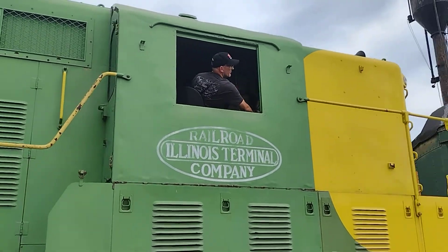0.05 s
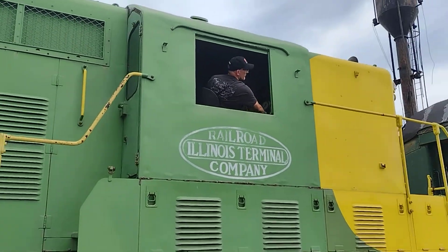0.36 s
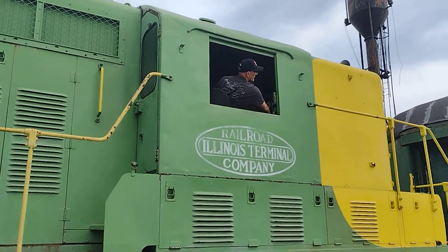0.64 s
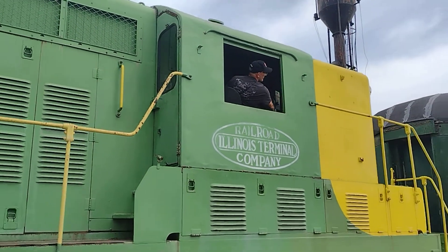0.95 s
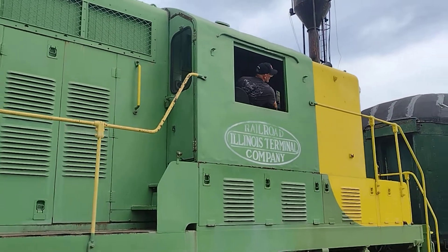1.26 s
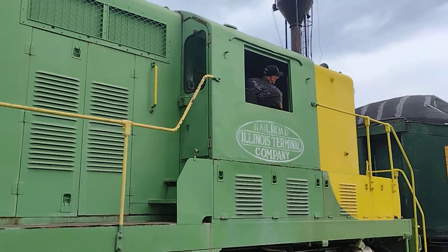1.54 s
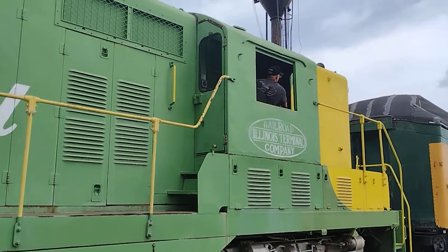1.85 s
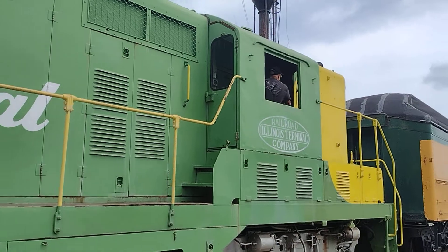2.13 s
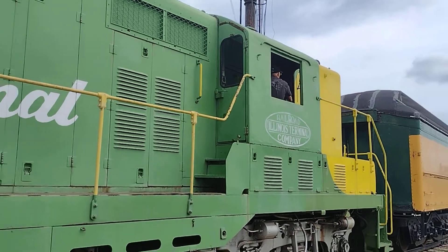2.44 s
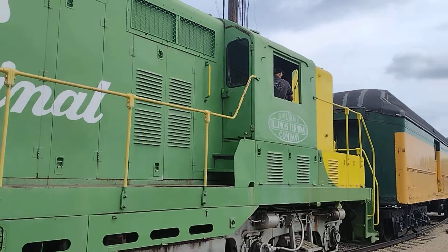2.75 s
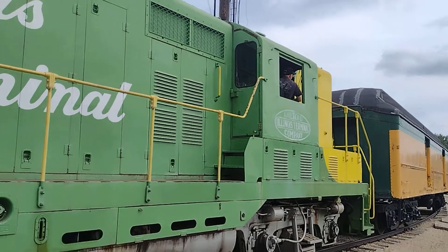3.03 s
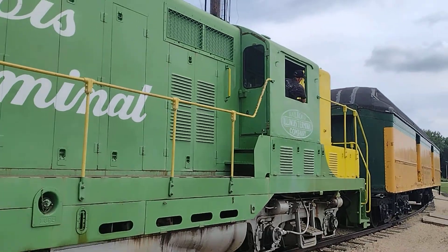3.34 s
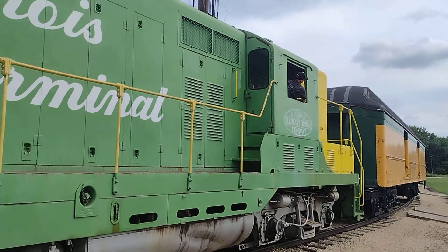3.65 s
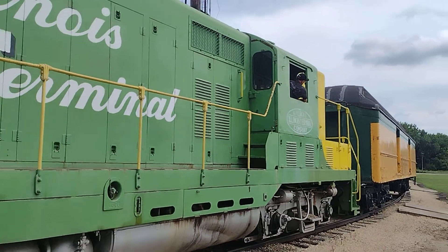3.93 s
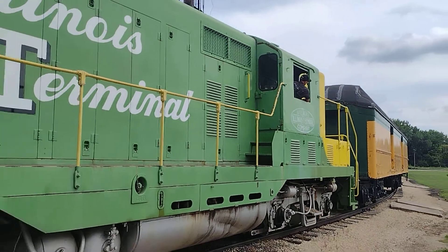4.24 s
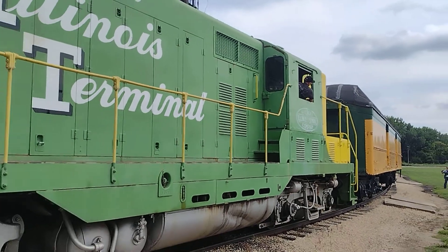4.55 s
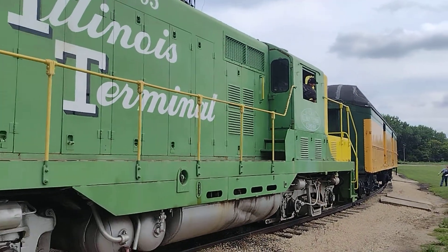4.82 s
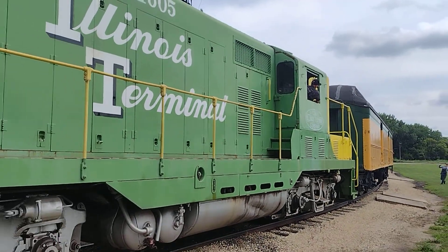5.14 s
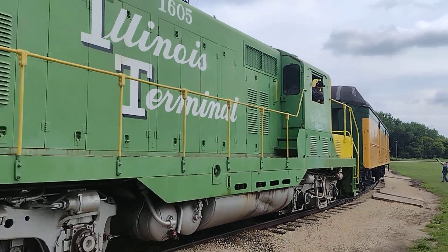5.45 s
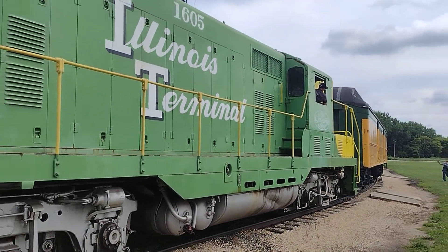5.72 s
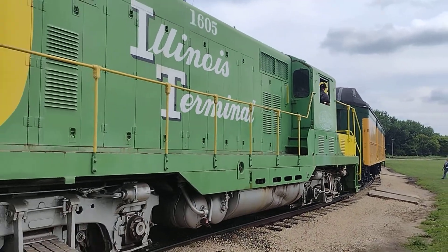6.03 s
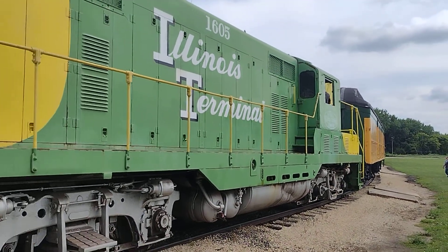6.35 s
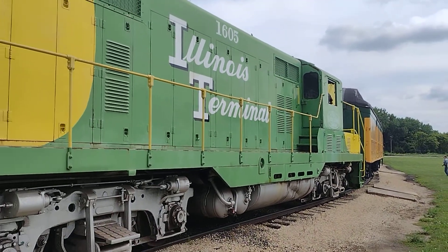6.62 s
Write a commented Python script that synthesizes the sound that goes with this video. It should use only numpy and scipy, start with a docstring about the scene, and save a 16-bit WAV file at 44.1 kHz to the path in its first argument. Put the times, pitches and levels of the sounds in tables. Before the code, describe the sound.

A diesel locomotive throbs slowly past at close range, a wheel squealing in bursts at first, followed by metal clinks, thuds and rattles.

```python
"""Outdoors, close beside a railway curve: a sixteen-cylinder two-stroke diesel locomotive slowly pushes a heavy
railcar past. Its firings pulse through exhaust, block, fans, gears and blower, each with its own swell as it
goes by. For the first two seconds a wheel sticks and slips on the rail, squealing while its flange rasps; later
the flange grinds briefly, the frame thuds and short bursts ring out near 2 kHz. Steel links clink and rigging
knocks over a soft bed of rolling hiss."""
import sys
import numpy as np
from scipy import signal
from scipy.fft import rfft, irfft, next_fast_len
from scipy.io import wavfile
from scipy.ndimage import map_coordinates

SR = 44100
rng = np.random.default_rng(int(sys.argv[2]) if len(sys.argv) > 2 else 0)


def master_out(mix):
    """Clip the mix to full scale and print it as 16-bit PCM to the path in sys.argv[1]."""
    frames = np.transpose(np.atleast_2d(mix))
    ceiling = np.clip(frames, -1, 1)
    pcm = np.round(ceiling * 32767).astype(np.int16)
    wavfile.write(sys.argv[1], SR, pcm)


N = 298998
TIME = np.arange(N) / SR
CRANK_HZ, SQUEAL_HZ = 4.245, 1967.2

# where the engine sits in the stereo image: t/s, right-ear lag/ms, left over right/dB
ENGINE_BEARING = [(0, 0.4, 0), (2.7, 0.47, 0.3), (4.7, 0.33, 0.3), (5.7, 0.23, .4), (6.78, .12, 0.5)]
# pass-by fader of each part: approaching/dB, abreast/dB, past/dB, t abreast/s, spread/s
PASS_BY = {"exhaust": (-28, -27.5, -33.5, 2.45, 2.2), "exhaust notes": (-26, -19.5, -36.5, 0.4, 2),
           "block": (-22.5, -22.5, -30.5, 3.0, 1.65), "fans": (-25.5, -23, -28, 3, -0.1),
           "gears": (-34.5, -33, -35.5, 3.5, 1.7), "intake": (-30.5, -31.5, -41, 1.77, 2),
           "wheels": (-45, -48.5, -53.5, 3.5, 1.4)}
# tone colours of the engine, from exhaust rumble up to blower breath: f/Hz, relative level/dB
EXHAUST_EQ = [(25, -34), (36, -35), (46, -13.5), (57, -10.5), (69, -2), (85, -2), (110, 2.5), (145, 1.5),
              (175, -2), (195, -8)]
BLOCK_EQ = [(100, -22.5), (175, -6), (242, 4.5), (301, 0.5), (335, 5.5), (367, -1), (470, -8.5), (610, -28),
            (1030, -120)]
FAN_EQ = [(260, -7), (440, 0), (606, 0), (657, -1), (776, -2.5), (868, -9.5), (930, -17.5), (1210, -16),
          (2050, -120)]
GEAR_EQ = [(880, 2.5), (1050, 2), (1200, 1), (1500, -2), (1800, -10.5)]
INTAKE_EQ = [(1000, -56), (1700, -3), (1850, -1.5), (1950, 2.5), (2070, 2.5), (2180, -3), (2360, -16.5),
             (2700, -25.5), (3510, -86), (5940, -120)]
# pitched core of the exhaust: multiple of the crank rate, relative level/dB
EXHAUST_NOTES = [(16, -11), (17, -12), (22, -12.5), (29, -11), (31, -12.5), (32, -9)]
# engine hums and whines: multiple of the crank rate, far level/dB, abreast level/dB, t/s, spread/s
ENGINE_ORDERS = [(8.2, -55, -54, 1.0, 2.0), (17, -58, -33, 0.3, 0.77), (15.96, -57, -30, 2.2, 0.4),
                 (29.93, -51, -30.5, 2.05, 0.57), (32, -51, -25.5, 1.2, 0.71),
                 (33.32, -43, -36.5, 2.94, 1.2), (48.9, -41, -38.5, 6.6, 5.7), (79.3, -47, -30, 2.6, 0.62),
                 (79.95, -43.5, -29.5, 5.64, 0.8), (114, -57.5, -39.5, 5.4, 0.64),
                 (317.4, -57, -46, 6.6, 1.2)]
# openings and panels that drone in passing: f/Hz, width/Hz, level/dB, t nearest/s, spread/s
PANEL_DRONES = [(68, 22, -32.5, 2.13, 0.4), (365, 50, -32, 2.4, 0.48), (559, 70, -34.5, 2.07, 0.52),
                (128.5, 43, -33.5, 1.35, 1.1), (257.4, 50, -31, 3.04, 1.07), (401, 56, -28.5, 3.6, 1.24),
                (487.5, 23, -33, 5.1, 2.3), (654, 32, -32, 0.36, 1.4), (721, 64, -30.5, 2.62, 1.2),
                (787, 113, -33.5, 5.98, 0.76), (1005, 17.5, -38.5, 4.35, 3), (1029, 38, -35.5, 2.56, 0.65),
                (1346.4, 29, -40.5, 3.9, 3.3), (1590, 470, -38.5, 4.54, 0.86), (2100, 210, -53, 2.8, 1.1),
                (2820, 430, -50.5, 5.03, 1.15), (4780, 106, -54, 3.7, 1.87), (4810, 120, -65, 6.24, 0.43)]

# bursts of squeal: t/s, length/s, level/dB
SQUEAL_BURSTS = [(-0.1, 0.24, -17), (0.19, 0.13, -24), (0.385, 0.097, -20.5), (0.57, 0.31, -16.5),
                 (0.87, 0.21, -22), (1.22, 0.16, -18.5), (1.41, 0.39, -17.5), (1.86, 0.065, -35),
                 (2.0, 0.08, -26)]
# the squeal darts between the ears: t/s, left over right/dB
SQUEAL_PAN = [(0.0, -4.5), (0.51, -15), (0.55, 7), (0.67, -19), (0.95, 4), (1.07, -14), (1.33, -1),
              (1.5, -9.5), (2.1, -4)]
# squeal overtones: multiple, clean level/dB, frayed level/dB, left over right/dB
SQUEAL_OVERTONES = [(2, -4.5, -6, 11), (3, -10, -7, 4), (4, -17, -11.5, -5), (5, -17.5, -13.5, -3.5),
                    (6, -17.5, -13.5, 0.5), (7, -15, -10, 4), (8, -10, -22, -26)]
# the flange bites harder and the squeal turns shrill: t/s, spread/s, overtone drive/dB
FLANGE_BITES = [(0.07, 0.17, -33.5), (0.25, 0.07, -37.5), (0.48, 0.085, -34), (0.62, 0.055, -35),
                (0.79, 0.061, -46), (0.92, 0.036, -39.5), (1.39, 0.12, -46), (1.58, 0.089, -26.5)]
# the slip grows irregular: t/s, fraction by which frayed overtones run sharp, clean overtone trim/dB
SLIP_FRAYING = [(0, 0.008, 3.5), (1.46, 0.0079, -4.5), (1.6, 0.02, -1), (2.1, 0.024, -8)]
# other wheel modes that the rubbing keeps singing: f/Hz, width/Hz, relative level/dB
WHEEL_MODES = [(1970, 6, 4.5), (2190, 81, -6), (3284, 52, -3.5), (4050, 41, 4), (4500, 110, -6),
               (6010, 11, -5)]
# spells of dry grinding: t/s, length/s, level/dB
GRIND_SPELLS = [(-0.1, 0.78, -48.5), (0.68, 0.33, -55), (1.28, 0.043, -40.5), (1.47, 0.46, -45.5),
                (1.56, 0.16, -39), (1.78, 0.014, -43), (1.815, 0.017, -36), (2.985, 0.06, -51.5),
                (3.222, 0.38, -48.5), (3.38, 0.056, -57), (3.5, 0.055, -43.5)]
# tone colours of steel on rail: f/Hz, relative level/dB
RASP_EQ = [(2500, 1), (3400, 12.5), (4500, 9), (5600, 7), (6800, -3), (9000, -5.5), (12500, -18),
           (16000, -42)]
GRIND_EQ = [(3000, -11), (3800, -10), (4800, -1), (6200, -8.5), (8300, -0.5), (12000, -6), (14300, 2),
            (16000, -6)]
ROLLING_EQ = [(2500, 1.5), (2900, -3.5), (3400, -8.5), (4200, -8), (5000, -9), (5600, -11.5), (6500, -18),
              (8300, -21), (10000, -18.5), (11000, -30), (12500, -30), (15000, -21.5), (16000, -28)]
# chirps of wheel and rail: t/s, f/Hz, width/Hz, spread/s, level/dB
WHEEL_CHIRPS = [(0.09, 7840, 11, 0.24, -43), (0.214, 4130, 81, 0.008, -27.5), (0.22, 5530, 510, .012, -36),
                (0.286, 5920, 84, 0.081, -40), (0.832, 5750, 47, .02, -42), (0.924, 5970, 55, 0.039, -41),
                (1.54, 5980, 27, 0.013, -36), (1.578, 7000, 180, .014, -44), (1.625, 3700, 47, 0.02, -37),
                (1.635, 8200, 110, .035, -37), (1.68, 4080, 22, 0.17, -40.5), (1.74, 6045, 27, 0.12, -40),
                (1.873, 3650, 140, .012, -40), (1.897, 3210, 110, 0.01, -37),
                (2.332, 5400, 450, 0.024, -48), (2.334, 4050, 400, 0.028, -47.5),
                (3.292, 4750, 110, 0.017, -42.5), (3.405, 10400, 500, 0.024, -52),
                (3.415, 14600, 900, 0.022, -48), (3.418, 3460, 210, 0.03, -48.5),
                (3.555, 15300, 600, .018, -46), (3.562, 8950, 700, 0.015, -47),
                (3.725, 4300, 1000, 0.012, -46), (3.788, 4220, 940, 0.027, -48),
                (4.77, 3760, 44, 0.023, -44.5), (4.772, 7900, 300, 0.022, -47), (6.37, 8200, 400, .01, -56)]

# clinks of the running gear: t/s, lowest mode drive/dB, highest mode drive/dB, decay/s
LINK_HITS = [(0.203, -11, -23, 0.021), (0.436, -24, -33, .023), (1.218, -16, -43, .016),
             (1.297, -18, -41, 0.022), (1.345, -30, -29, 0.013), (1.818, -24, -41, .015),
             (1.8774, -12, -56, .023), (3.604, -28, -44, .004), (3.795, -31, -46, 0.031),
             (4.085, -43, -51, .03), (4.185, -41, -48, .04), (4.305, -37, -43, .028),
             (4.429, -26, -48, .012), (4.746, -19.5, -35.5, 0.022), (4.9, -24, -50, 0.027),
             (4.962, -36, -48, .012), (5.046, -33, -43, .013), (5.207, -35, -46, .02),
             (5.25, -34, -61, .04), (6.098, -38, -52, .015), (6.144, -28, -62, .023),
             (6.198, -29, -57, 0.02), (6.232, -25, -58, .015), (6.36, -21, -54.5, 0.016),
             (6.447, -27, -51, 0.018)]
# ring of the steel links: f/Hz, width/Hz, relative level/dB
LINK_RING = [(2740, 560, -0.5), (3950, 500, -2.5), (4450, 540, -2.5), (5800, 820, -5.5), (7930, 1340, -3),
             (8460, 880, -19), (10200, 1500, -14), (14000, 2500, -10)]
# jolts to the frame: t/s, drive/dB
FRAME_HITS = [(2.856, -18.5), (3.144, -19.5), (3.808, -11), (3.818, -10.5), (3.855, -16.5)]
# boom of the frame: f/Hz, width/Hz, relative level/dB
FRAME_RING = [(204.7, 14, -4.5), (255, 30, 9.5), (356, 12, -27)]
# bumps of the rigging: t/s, drive/dB
RIGGING_HITS = [(.447, -28), (1.22, -22.5), (4.752, -30)]
# dull colour of a bump: f/Hz, relative level/dB
KNOCK_EQ = [(450, 0), (700, 6), (1300, 0), (2200, -7), (3000, -12), (6000, -21)]
# short ringing bursts: t/s, level/dB
RING_BURSTS = [(4.44, -35), (4.71, -38), (5.17, -32), (5.31, -31), (5.405, -35.5), (5.535, -39),
               (5.65, -38), (5.785, -34), (5.865, -35), (6.1, -31.5), (6.58, -32.5)]
# ring of the bursts: f/Hz, width/Hz, relative level/dB
BURST_RING = [(1360, 53, -8), (1963, 90, 0), (2083, 99, -5.5)]
# swells of chain rattle: t/s, spread/s, level/dB
CHAIN_SWELLS = [(4.25, 0.27, -62), (5.05, 0.36, -58), (6.3, 0.2, -66)]


def diesel(lope_db=-0.3, lope_at_s=0.01217, chuff_db=4):
    """The crankshaft drives every layer; once a turn the exhaust lopes and the blower chuffs."""
    turns = np.cumsum(CRANK_HZ * (1 + 0.001496 * drift(1.232))) / SR
    cycle = turns - lope_at_s * CRANK_HZ
    lope = from_db(lope_db * np.cos(2 * np.pi * cycle))
    chuff = from_db(chuff_db * swell((cycle + .5) % 1 - .5, spread=0.14))
    puffs = lope * firings(turns, EXHAUST_EQ, repeat=0.69, throb=1.22, uneven_db=1.5, diffuse=0.012)
    notes = exhaust_notes(cycle)
    block = firings(turns, BLOCK_EQ, repeat=0.58, throb=0.49, uneven_db=2.5, diffuse=0.016)
    fans = firings(turns, FAN_EQ, repeat=0.51, throb=0.096, uneven_db=0.5, diffuse=0.16)
    gears = firings(turns, GEAR_EQ, repeat=0.34, throb=0.22, uneven_db=1.54, diffuse=0.4)
    intake = chuff * firings(turns, INTAKE_EQ, repeat=0.077, throb=0.2, uneven_db=0.8, diffuse=0.93)
    layers = {"exhaust": puffs, "exhaust notes": notes, "block": block, "fans": fans,
              "gears": gears * pan(-0.7), "intake": intake * pan(0.59)}
    return sum(going_by(part) * layer for part, layer in layers.items()) + engine_tones(turns)


def firings(turns, eq, repeat, throb, uneven_db, diffuse, cylinders=16):
    """Each cylinder fires a noisy pulse of its own strength; part of the texture loops every turn."""
    one_turn = rms_one(irfft(np.exp(2j * np.pi * rng.random(int(SR / CRANK_HZ / 2)))))
    loop = one_turn[(turns % 1 * len(one_turn)).astype(int)]
    noise = np.sqrt(repeat) * loop + np.sqrt(1 - repeat) * rng.standard_normal(N)
    cylinder_db = uneven_db * rms_one(rng.standard_normal(cylinders))
    fired = turns * cylinders
    pulses = from_db(cylinder_db[fired.astype(int) % cylinders]) * np.exp(-throb * (fired % 1))
    return colour(scatter(noise, diffuse) * pulses, eq)


def exhaust_notes(cycle):
    """Neighbouring firing orders beat together once per turn."""
    return sum(from_db(db) * sine(2 * np.pi * order * cycle + 0.7 * drift(7.1))
               for order, db in EXHAUST_NOTES)


def engine_tones(turns, waver_db=2.5):
    """Firing, blower and gear tones waver, each swelling as its source goes by."""
    out = np.zeros(N)
    for order, far_db, abreast_db, s, spread_s in ENGINE_ORDERS:
        level_db = far_db + (abreast_db - far_db) * swell(TIME - s, spread_s) + waver_db * drift(2.9)
        phase = 2 * np.pi * (order * turns + rng.random()) + 0.34 * drift(1.0)
        out += from_db(level_db) * sine(phase)
    return out


def passing_panels():
    """Openings and panels drone as they come abreast; the high ones sound wider."""
    narrow, wide = shaking(diffuse=0.03), shaking(diffuse=0.64)
    return sum(from_db(db) * swell(TIME - s, spread_s) * singing(narrow if hz < 900 else wide, hz, width)
               for hz, width, db, s, spread_s in PANEL_DRONES)


def wheel_squeal(grinding, contact_ends_s=2.29, fade_s=0.29):
    """Stick and slip lock onto one wheel mode, which screams until the flange eases off the rail."""
    level_db = to_db(spells(SQUEAL_BURSTS, attack_s=0.049, release_s=0.064))
    side_db, = in_time(SQUEAL_PAN)
    phase = 2 * np.pi * np.cumsum(SQUEAL_HZ + 0.83 * drift(2.17)) / SR
    tone = from_db(level_db + 0.8 * drift(20)) * pan(side_db + 3.0 * drift(14)) * sine(phase)
    slip_phase = phase + .07 * drift(90) + .05 * drift(15)
    friction = shaking(diffuse=0.74)
    overtones = slip_overtones(slip_phase, friction, level_db, grinding)
    contact = np.clip((contact_ends_s - TIME) / fade_s, 0, 1)
    return contact * (tone + overtones + flange_rasp(friction, grinding))


def slip_overtones(slip_phase, friction, tone_db, grinding, stutter_db=3.0):
    """The squeal's shrill edge: uneven slips fray each overtone on its upper side."""
    bites = sum(from_db(db) * swell(TIME - s, spread_s) for s, spread_s, db in FLANGE_BITES)
    broken_db = 0.15 * np.maximum(to_db(grinding) + 35, 0)  # hard grinding breaks up the regular slip
    edge_db = to_db(from_db(tone_db - 29) + bites) - broken_db
    uneven_slips = friction + 1j * shaking(diffuse=1.0)
    sharp, trim_db = in_time(SLIP_FRAYING)
    frayed_phase = 2 * np.pi * np.cumsum(SQUEAL_HZ * (1 + sharp)) / SR
    out = 0
    for multiple, clean_db, frayed_db, side_db in SQUEAL_OVERTONES:
        ear_phase = rng.uniform(0, 2 * np.pi, (2, 1))
        clean = from_db(clean_db + trim_db) * sine(multiple * slip_phase + ear_phase)
        frayed = from_db(frayed_db) * ragged(uneven_slips, multiple * frayed_phase, width_hz=multiple * 58)
        # low overtones ride the tone itself, high ones the edge of the slip
        follow = 0.56 / (multiple - 1)
        drive_db = follow * (tone_db - 21.5) + (1 - follow) * (edge_db + stutter_db * drift(30))
        out += from_db(drive_db) * pan(side_db) * (clean + frayed)
    return out


def flange_rasp(friction, grinding):
    """The rubbing flange rasps and sets other wheel modes singing, louder when it grinds."""
    rubbing = from_db(-48.5) + from_db(-5.5) * grinding
    song = sum(from_db(db) * singing(friction, hz, width) for hz, width, db in WHEEL_MODES)
    rasp = colour(friction * from_db(2.4 * drift(120) + 1.53 * drift(29)), RASP_EQ)
    return rubbing * (from_db(-3.5) * song + from_db(3.5) * pan(2.5) * rasp)


def flange_grind(grinding):
    """A gritty scrape: the contact patch wanders, favouring now one ring of the steel, now another."""
    bite = grinding * from_db(drift(40.3) + drift(300))
    friction = shaking(diffuse=1.0)
    rings = sum(from_db(1.9 * drift(25)) * resonate(friction, hz, width_hz=670)
                for hz in np.geomspace(3600, 15000, 10))
    return bite * colour(rms_one(rings) + from_db(-5) * crushed_grit(), GRIND_EQ) * pan(6.9)


def crushed_grit(grains_per_s=1200, size_db=2.5, pitches=18):
    """Grit cracks under the flange, each grain ringing briefly at one of many pitches; rms 1."""
    cracks = rng.random(N) < grains_per_s / SR
    sizes = from_db(size_db * np.minimum(rng.exponential(1, N), 3))
    grains = cracks * sizes * rng.standard_normal((2, N))
    pitch = rng.integers(0, pitches, N)
    return rms_one(sum(resonate(grains * (pitch == k), hz, width_hz=94)
                       for k, hz in enumerate(np.geomspace(3600, 15000, pitches))))


def wheel_chirps():
    """A wheel catches for an instant and one of its modes flares up, unsteady in pitch."""
    out = np.zeros(N)
    for s, hz, width_hz, spread_s, db in WHEEL_CHIRPS:
        near = np.abs(TIME - s) < .3
        age = TIME[near] - s
        jitter = signal.lfilter([.02], [1, -.98], rng.standard_normal(len(age)))
        wander = np.cumsum(jitter) * np.sqrt(2 * np.pi * width_hz / SR)
        out[near] += from_db(db) * swell(age, spread_s) * sine(2 * np.pi * hz * age + wander)
    return out * from_db(2.3 * drift(170)) * pan(7.2)


def link_clinks(attack_s=0.0073, grit_db=2.2, variety_db=1.5):
    """Each clink is a short dying chatter of steel on steel, with its own mix of modes."""
    age = TIME[:SR // 3]
    force = np.zeros((len(LINK_RING), N + len(age)))
    treble = np.linspace(0, 1, len(LINK_RING))
    for s, low_db, high_db, decay_s in LINK_HITS:
        envelope = (1 - np.exp(-age / attack_s)) * np.exp(-age / decay_s)
        tilt_db = (1 - treble) * (low_db - 2) + treble * (high_db + 9.5)
        mode_db = tilt_db + variety_db * rng.standard_normal(len(treble))
        force[:, int(s * SR):int(s * SR) + len(age)] += from_db(mode_db)[:, None] * envelope
    chatter = shaking(diffuse=1.0)
    ring = 0
    for k, (hz, width_hz, db) in enumerate(LINK_RING):
        drive = chatter * from_db(grit_db * drift(130)) * force[k, :N]
        ring += (-1) ** k * from_db(db) * resonate(drive, hz, width_hz)
    return ring * pan(4.8)


def frame_thuds(attack_s=0.0043):
    """Slack runs in and the heavy frame booms."""
    age = TIME[:SR // 2]
    boom = sum(from_db(db) * np.sin(2 * np.pi * hz * age) * np.exp(-np.pi * width_hz * age)
               for hz, width_hz, db in FRAME_RING)
    boom *= 1 - np.exp(-age / attack_s)
    out = np.zeros(N)
    for s, db in FRAME_HITS:
        out[int(s * SR):int(s * SR) + len(age)] += from_db(db) * boom
    return out


def rigging_knocks(attack_s=0.0014):
    """Loose rigging bumps the truck frame with a short, dull clatter."""
    envelope = spells([(s, attack_s, db) for s, db in RIGGING_HITS], attack_s, release_s=0.046)
    return envelope * colour(shaking(diffuse=0.58), KNOCK_EQ)


def ringing_bursts(length_s=0.019):
    """Short bursts ring out near 2 kHz."""
    force = shaking(diffuse=0.6)
    ring = rms_one(sum(from_db(db) * singing(force, hz, width) for hz, width, db in BURST_RING))
    return ring * spells([(s, length_s, db) for s, db in RING_BURSTS], attack_s=0.006, release_s=0.019)


def rolling_hiss():
    """Wheels rolling on rail lay down a wide, fluttering bed of hiss."""
    flutter = from_db(1.2 * drift(25))
    return going_by("wheels") * flutter * colour(shaking(diffuse=1.0), ROLLING_EQ) * pan(2.3)


def loose_chains(grain_db=6.0):
    """Chains and brake rigging add a soft, grainy rattle under the later clinks."""
    force = shaking(diffuse=1.0)
    ring = sum(from_db(db + grain_db * drift(45)) * resonate(force, hz, width)
               for hz, width, db in LINK_RING)
    envelope = sum(from_db(db) * swell(TIME - s, spread_s) for s, spread_s, db in CHAIN_SWELLS)
    return envelope * rms_one(ring) * pan(4.0)


def going_by(part):
    """Gain of a part as it approaches, comes abreast and moves on."""
    before_db, abreast_db, after_db, s, spread_s = PASS_BY[part]
    away_db = np.where(TIME < s, before_db, after_db)
    return from_db(away_db + (abreast_db - away_db) * swell(TIME - s, spread_s))


def spells(rows, attack_s, release_s):
    """Envelope of sounds that build, hold and die away."""
    gain = np.zeros(N)
    for s, length_s, db in rows:
        rise = 1 - np.exp(-np.maximum(TIME - s, 0) / attack_s)
        fall = np.exp(-np.clip((TIME - s - length_s) / release_s, 0, 20))
        gain += from_db(db) * rise * fall
    return gain


def swell(offset, spread):
    """A bell-shaped rise and fall around zero."""
    return np.exp(-np.minimum((offset / spread) ** 2, 50))


def in_time(rows):
    """One automation curve for each column after the time."""
    s, *columns = np.transpose(rows)
    return [np.interp(TIME, s, column) for column in columns]


def drift(rate_hz, hop=40):
    """Smooth random wander; rms about 1."""
    r = np.exp(-2 * np.pi * rate_hz * hop / SR)
    slow = signal.lfilter([1], [1, -2 * r, r * r], rng.standard_normal(N // hop + 2002))[2000:]
    return np.interp(np.arange(N) / hop, np.arange(len(slow)), rms_one(slow))


def colour(x, eq):
    """Shape x with an EQ curve that falls 60 dB an octave past its ends; rms 1."""
    hz, db = np.transpose(eq)
    size = next_fast_len(N)
    octave = np.log2(np.maximum(np.fft.rfftfreq(size, 1 / SR), 1))
    outside = np.abs(octave - np.clip(octave, np.log2(hz[0]), np.log2(hz[-1])))
    gain = from_db(np.interp(octave, np.log2(hz), db) - 60 * outside)
    return rms_one(irfft(rfft(x, size) * gain, size)[..., :N])


def resonate(x, hz, width_hz):
    """One resonance with unit gain at its peak."""
    r = np.exp(-np.pi * width_hz / SR)
    feedback = [1, -2 * r * np.cos(2 * np.pi * hz / SR), r * r]
    return signal.lfilter(np.array([1, 0, -1]) * (1 - r * r) / 2, feedback, x + 1e-18)


def singing(force, hz, width_hz):
    """A resonance, doubled for steep flanks, kept ringing by a force; rms 1."""
    section = np.concatenate(signal.iirpeak(hz, hz / width_hz, fs=SR))
    return rms_one(signal.sosfilt([section, section], force))


def ragged(force, phase, width_hz):
    """A tone roughened in strength and timing by a complex random force; rms 1."""
    r = np.exp(-np.pi * width_hz / SR)
    wobble = signal.lfilter([1], [1, -2 * r, r * r], force)
    return rms_one(np.real(wobble * np.exp(1j * phase)))


def shaking(diffuse):
    """A random force in stereo: centred at 0, fully wide at 1."""
    return scatter(rng.standard_normal(N), diffuse)


def scatter(direct, share):
    """Blend direct sound with a share of noise that differs between the ears."""
    return np.sqrt(1 - share) * direct + np.sqrt(share) * rng.standard_normal((2, N))


def pan(db):
    """Constant-power gains; positive dB leans left."""
    gains = from_db(np.array([[.5], [-.5]]) * db)
    return gains / np.sqrt(np.mean(gains ** 2, axis=0))


def delay_right(x, ms):
    """Sound from the left reaches the right ear later."""
    return np.array([x[0], map_coordinates(x[1], [np.arange(N) - ms * SR / 1000], order=3)])


def sine(phase):
    """A pure tone; rms 1."""
    return np.sqrt(2) * np.sin(phase)


def rms_one(x):
    """Scale to unit power."""
    return x / np.sqrt(np.mean(x ** 2) + 1e-20)


def from_db(db):
    """Decibels to gain."""
    return 10 ** (np.asarray(db) / 20)


def to_db(gain):
    """Gain to decibels."""
    return 20 * np.log10(gain + 1e-9)


def scene():
    """The mix: the engine glides from the left towards the centre; the running gear stays left."""
    lag_ms, side_db = in_time(ENGINE_BEARING)
    body = diesel() + ringing_bursts() + passing_panels() + frame_thuds() + rigging_knocks()
    grinding = spells(GRIND_SPELLS, attack_s=0.0082, release_s=0.011)
    squeal = wheel_squeal(grinding)
    wheels = rolling_hiss() + flange_grind(grinding) + wheel_chirps()
    links = loose_chains() + link_clinks()
    return delay_right(body * pan(side_db) + squeal, lag_ms) + wheels + links


def record(dry, cutoff_hz=15780):
    """A steep low-pass takes off the very top."""
    return signal.sosfilt(signal.ellip(12, .1, 90, cutoff_hz, fs=SR, output="sos"), dry)


dry = scene()
out = record(dry)
master_out(out)
```